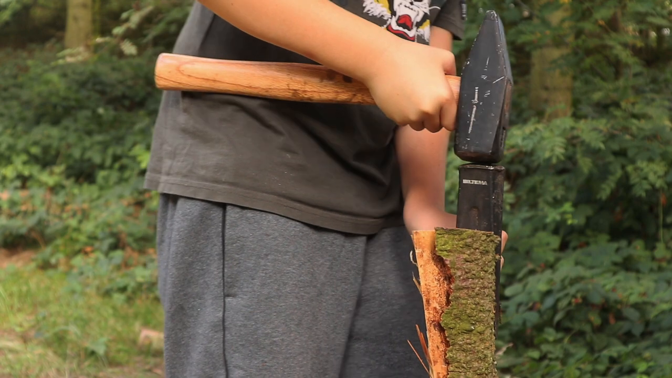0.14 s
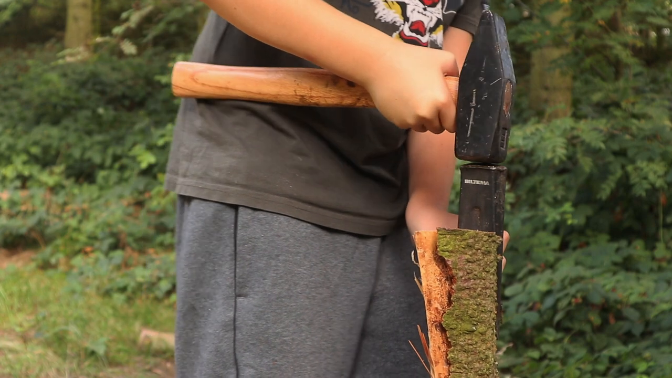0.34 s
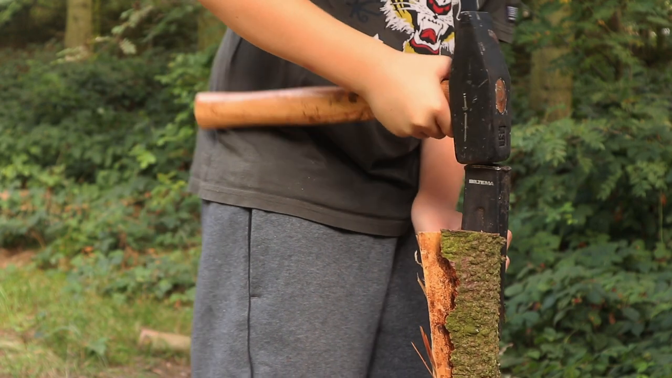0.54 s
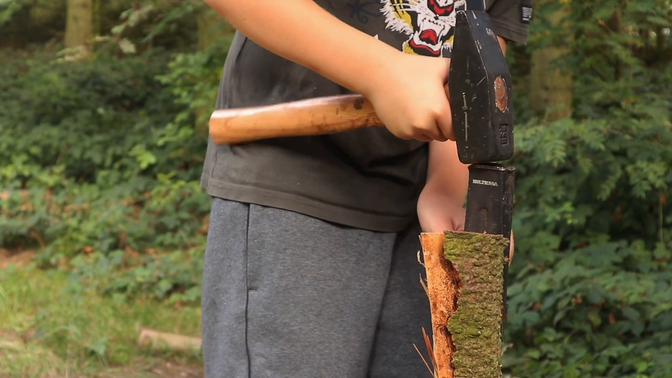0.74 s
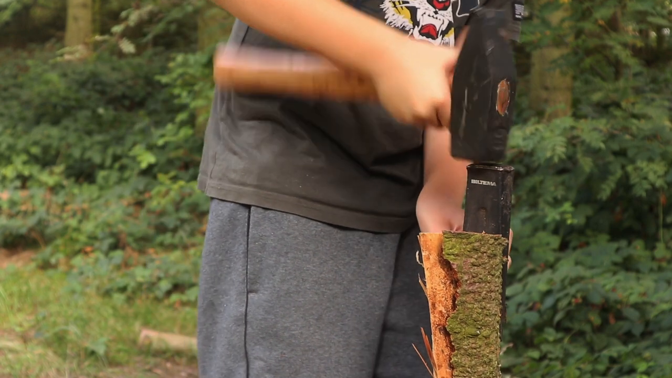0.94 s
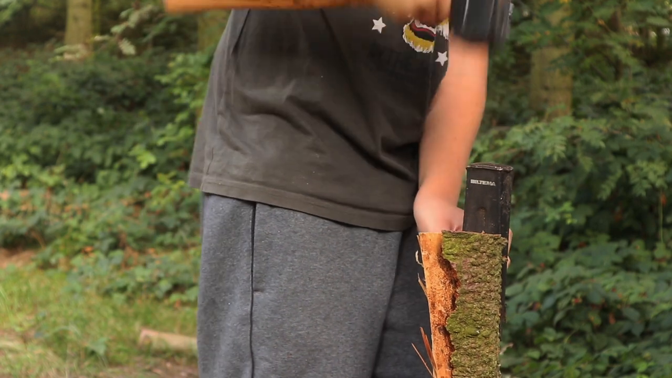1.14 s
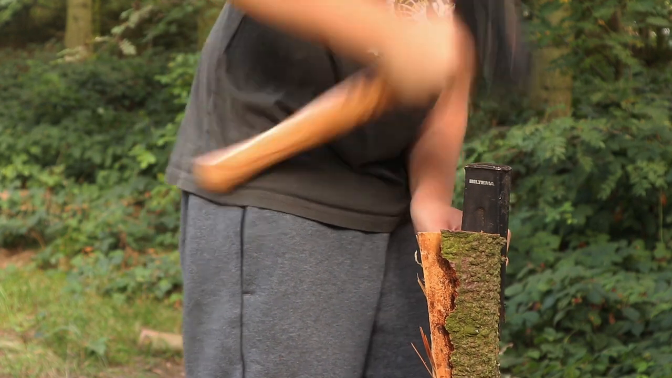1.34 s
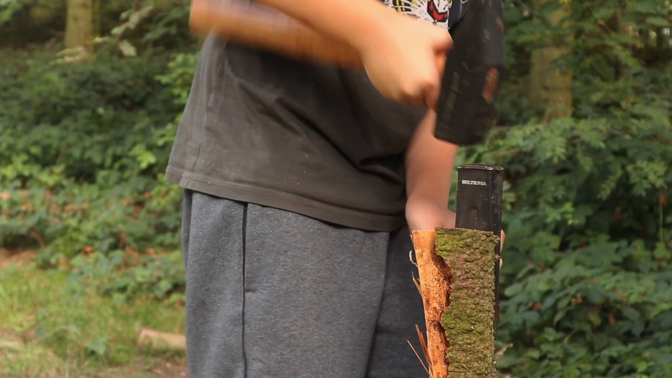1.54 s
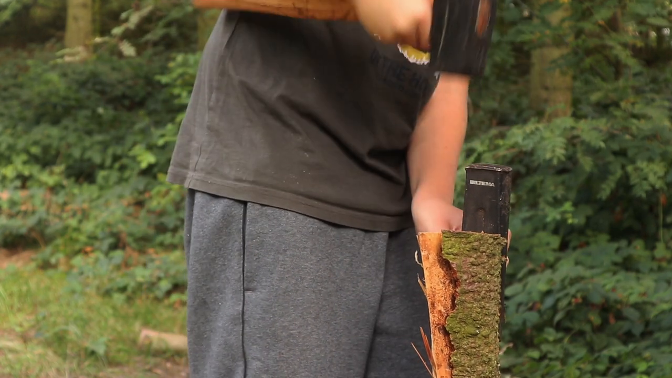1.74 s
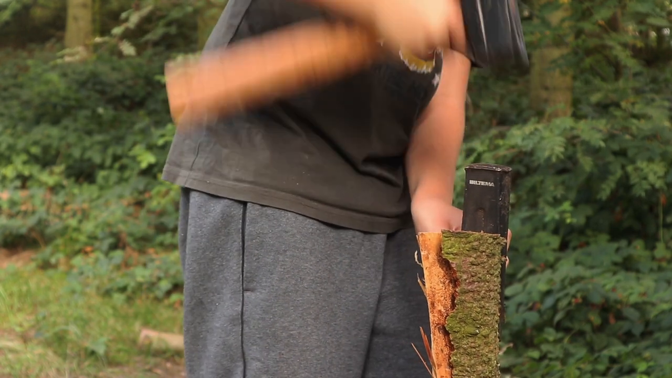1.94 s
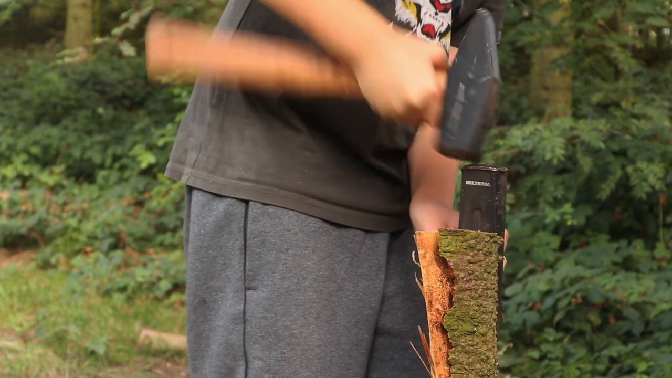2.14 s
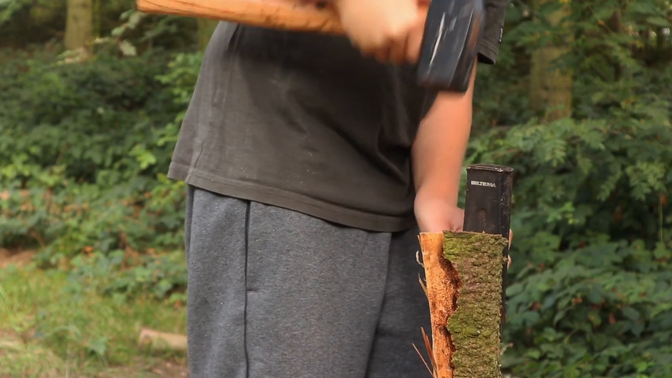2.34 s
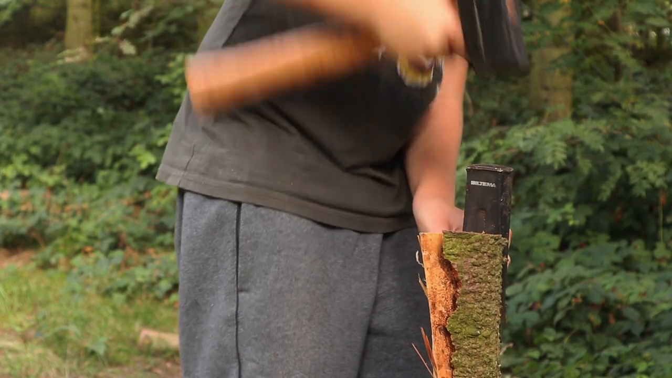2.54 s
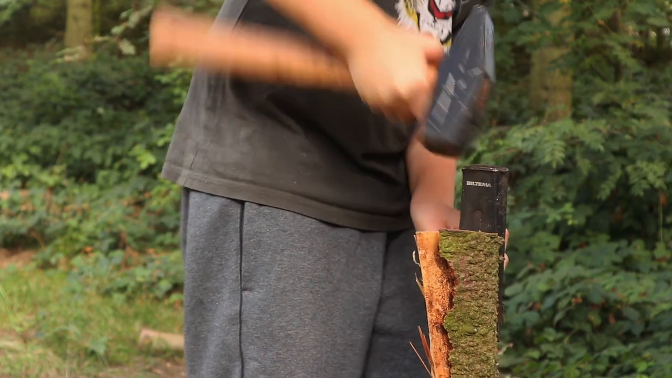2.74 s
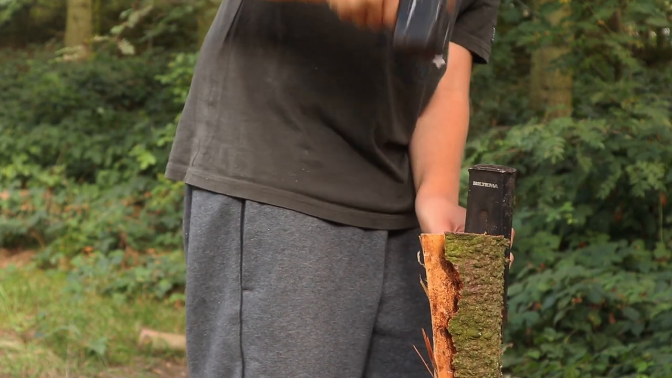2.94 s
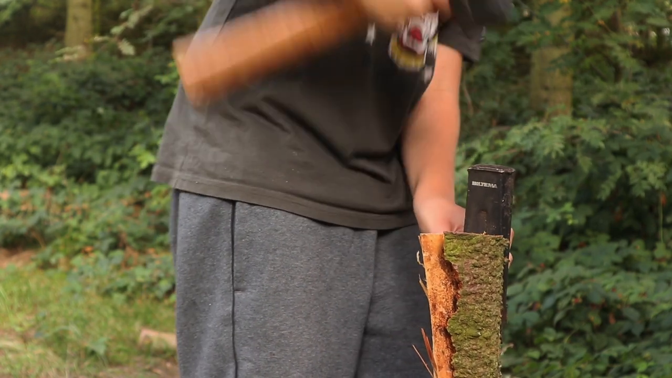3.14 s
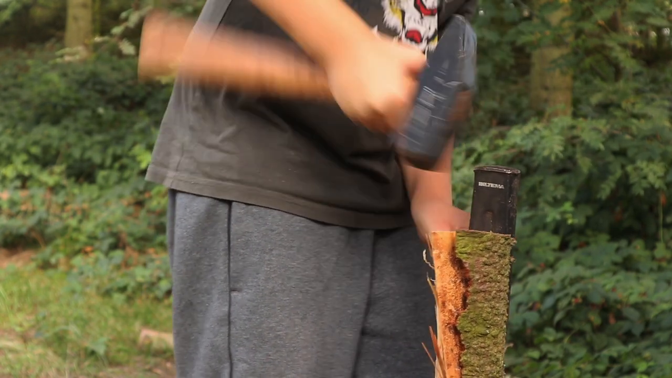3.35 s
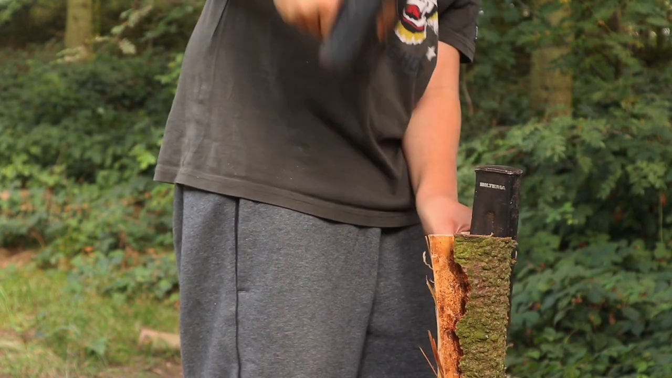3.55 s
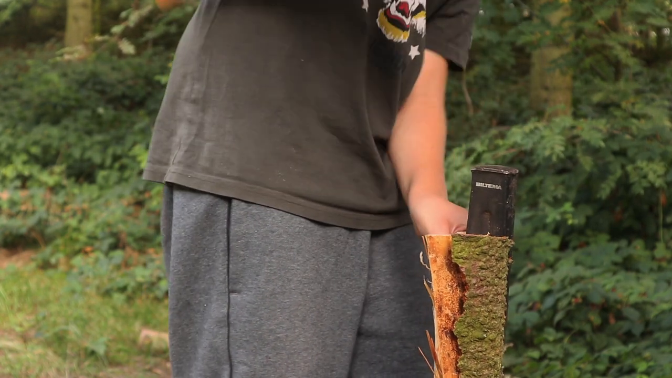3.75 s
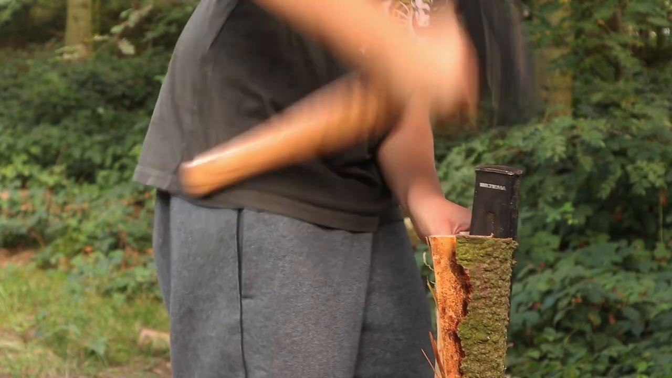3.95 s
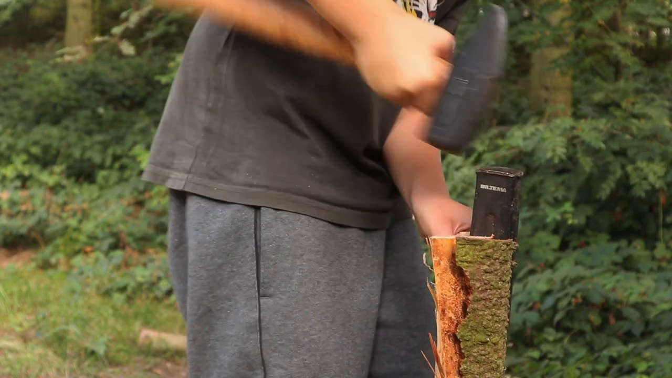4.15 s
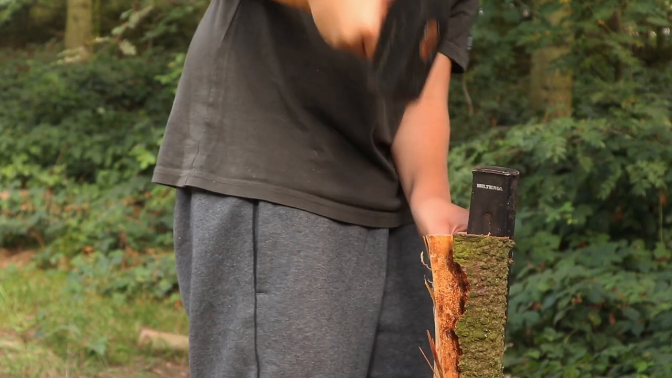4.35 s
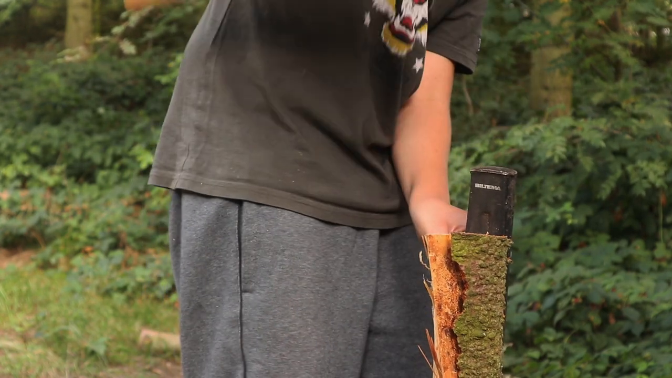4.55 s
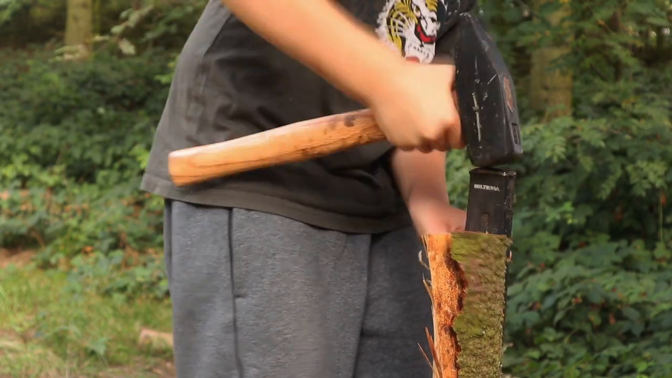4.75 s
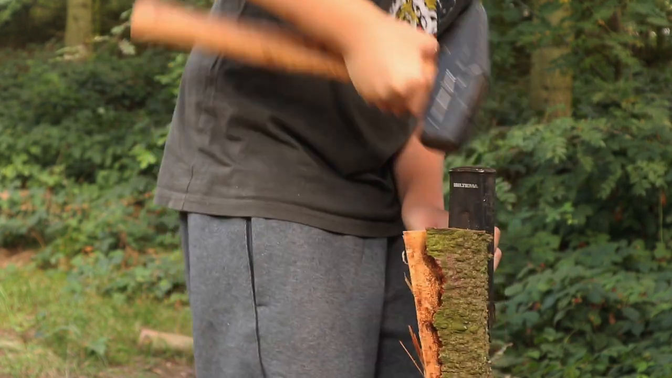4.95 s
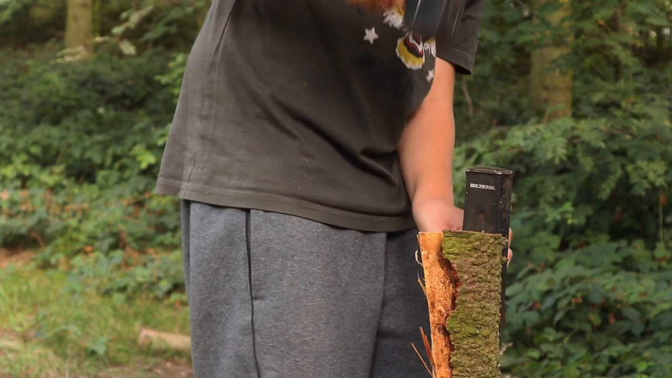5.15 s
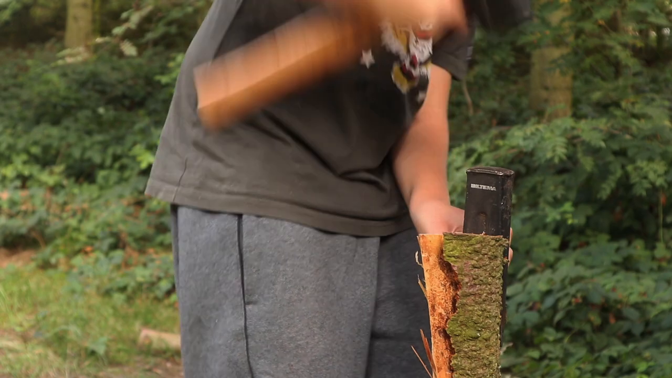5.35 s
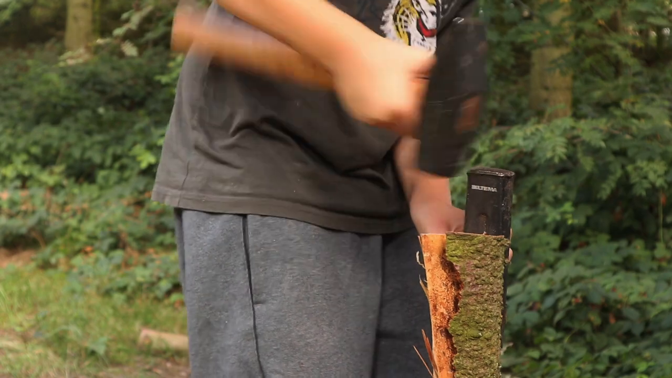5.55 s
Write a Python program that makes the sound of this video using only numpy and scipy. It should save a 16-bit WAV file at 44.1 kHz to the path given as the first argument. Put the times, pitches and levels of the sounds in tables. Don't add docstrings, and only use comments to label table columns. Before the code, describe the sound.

Seven hard hammer blows ring on a steel wedge in a log, cracking sharply and echoing off trees while birds whistle.

```python
import sys
import numpy as np
from scipy import signal
from scipy.fft import rfft, irfft, next_fast_len
from scipy.io import wavfile
from scipy.ndimage import uniform_filter1d

SR = 44100
rng = np.random.default_rng(int(sys.argv[2]) if len(sys.argv) > 2 else 0)


def unload_wav(signal):
    wavfile.write(
        sys.argv[1],
        SR,
        np.round(np.clip(np.atleast_2d(signal).T, -1, 1) * 32767).astype(np.int16),
    )


def volts(x):
    e = np.asarray(x, float) / 20
    return 10 ** e


N = 250915

# [t/s, strength of body sound and crack/dB, weight into the log/dB, glancing 0-1, centred on the
BLOWS = [
    (1.35, 5, 10, 0.1, 0.02),
    (1.987, 0.06, 3.5, 0, .05),
    (2.596, -7.5, 4, 0.5, .05),
    (3.209, -9.5, 2.5, .95, 0.11),
    (3.977, -7.5, 1.66, .2, .95),
    (4.747, -11.5, 1, 0.01, 0.7),
    (5.428, -5, 1.5, 0.4, 0.9),
]
# [log knock level/dB, wedge bend level/dB, wedge twist level/dB, head level/dB, pitch factor]
LANDING = [(2.5, -6.5, -5, 1, 1.02), (-1.5, -1, -1.5, -2.5, .995), (3, 2, 0.5, 1, 1.0),
           (3, -2, 3, -2, .995), (-1.5, -5.5, -3.5, -2.5, .995), (-1.5, 3.5, 4.5, -0.5, .99),
           (-7.5, 0, -4, 1.5, 1.01)]
# [lowest knock level/dB, lower bend level/dB, lower twist level/dB,
# upper head level/dB]
FAVOURS = [(14, 3.5, 1, -2.5), (-12, -6, -8, 0.5), (10, 2, 1, -1), (6, 2, -16, -10.5), (6, 4.5, -6, 14),
           (4, -1, -4, 4), (1, 4.5, -6, 0.5)]
# [flank level/dB, face level/dB, top level/dB]
SINGS = [(4, -0.5, -3.5), (-1, -1, -2.5), (-0.5, -1.5, -2), (-2.5, -4, 0.5), (-5, 1, 0), (0, 3, 4),
         (4, 7, 7.5)]


def hammer_blows(near, side, sends):
    for k, parts in enumerate(BLOWS):
        s, sounds = blow(*parts, LANDING[k], FAVOURS[k], SINGS[k])
        for mix, sound in zip((near, side, sends[k % 3]), sounds):
            add(mix, s, sound)


# [f/Hz, level/dB, t60/s]
FLANK = [(6930, -3, .06), (8484, -2, .065), (9670, -3, .05)]
FACE = [(9104, -3, .13), (9150, -13, .09)]
TOP = [(12340, 0, .075), (15190, -8, .08)]
# [f/Hz, level/dB, t60/s]
THUD = [(150.5, -0.5, 0.023), (205, -3.5, 0.027), (288, -7, 0.028)]
# [f/Hz, level/dB, t60/s]
GROUND = [(45, -33, .26), (72, -41, .17), (115, -44, .14), (165, -43, .12)]
# [f/Hz, level/dB]
CRACK = [(60, -49), (450, -35.5), (1000, -10), (4000, -4), (7000, -4.5), (10000, -4.5), (14000, -17.5),
         (17000, -25.5)]
THUD_DB, THUD_PER_WEIGHT, CRACK_DB, ECHO_DB = -20.5, 2.6, 1.5, -21.5


def blow(s, strength_db, weight_db, glance, centre, landing, favours, sings_db):
    body_db, ring_db, chatter_s, bright_hz = contact(strength_db, weight_db, glance, centre)
    t = np.arange(1024) / SR
    tick = t == 0
    force = 0.18 * rng.standard_normal(len(t)) * np.exp(-(t / chatter_s) ** 2) + tick

    sound = log_and_steel(force, body_db, landing, favours)
    age = np.arange(len(sound)) / SR
    for modes, db in zip((FLANK, FACE, TOP), ring_db + sings_db):
        sound += struck(modes, force, db)
    sound += volts(THUD_DB + THUD_PER_WEIGHT * weight_db) * ring(THUD) * (1 - np.exp(-age / 0.001))
    sound += volts(weight_db / 2) * ring(GROUND) * (1 - np.exp(-(age / .015) ** 2))
    crack_db = strength_db + CRACK_DB
    sound[:len(t)] += volts(crack_db) * burst(CRACK, t, .0025)

    scatter_colour = CRACK[:-2] + [(12000, -32), (17000, -46)]
    scatter = volts(crack_db - 6) * burst(scatter_colour, t, min(.8 * chatter_s, .003))
    side = np.pad(scatter, (0, len(sound) - len(t)))

    echo = volts(-19.5 - strength_db) * sound * quick_fall(len(sound), .0025, -40)
    echo[0] += 6.5
    echo = signal.lfilter(*signal.butter(1, bright_hz, fs=SR), echo)
    return s + 0.0023, np.array([sound, side, volts(ECHO_DB + weight_db) * echo])


# [level/dB] of a square blow,
# then its change [level/dB] when glancing and when centred
BODY_DB = [5.9, 1.1, 11.78, 7.1]
GLANCE_DB = [-11.5, -5, -4.5, 6.5]
CENTRE_DB = [1, -1.8, 0.19, -2]
# flank, face and top rings of the steel, likewise [level/dB]
RING_DB = [-36, -44, -43]
RING_GLANCE_DB = [-2, -2, 5]
RING_CENTRE_DB = [6, 16, 1]
FIRM_S, SOFT_S = 0.0037, 0.0042
BRIGHT_HZ, DULL_OCTAVES = 11400, 1.05


def contact(strength_db, weight_db, glance, centre):
    body_change = np.multiply(GLANCE_DB, glance) + np.multiply(CENTRE_DB, centre)
    body_db = strength_db + np.add(BODY_DB, body_change)
    ring_change = np.multiply(RING_GLANCE_DB, glance) + np.multiply(RING_CENTRE_DB, centre)
    ring_db = np.add(RING_DB, ring_change)
    ring_db[0] += 2 * weight_db
    chatter_s = FIRM_S + (SOFT_S - FIRM_S) * glance
    bright_hz = BRIGHT_HZ / 2 ** (DULL_OCTAVES * max(glance, centre))
    return body_db, ring_db, chatter_s, bright_hz


# [f/Hz, level/dB, t60/s]
KNOCK = [(585, -9, 0.05), (780, 8, 0.055), (930, -12, .05), (1324, -5, 0.053)]
BEND = [(1515, 4.5, 0.037), (1842, 4.7, 0.054)]
TWIST = [(2199, 1.5, 0.025), (2768, 3.5, 0.01), (2690, -8.5, 0.03)]
HEAD = [(3400, 3, 0.02), (3795, 8.5, 0.014), (4450, -6, 0.044), (4792, -15.5, 0.058)]
HOLD_S, KNOCK_RISE_S = 0.0052, .002


def log_and_steel(force, body_db, landing, favours):
    *more_db, pitch = landing
    sounds = []
    favoured = (0, 0, 0, 2)
    for modes, extra_db, which, db in zip((KNOCK, BEND, TWIST, HEAD), favours, favoured, body_db + more_db):
        shifted = [(hz * pitch, own_db + extra_db * (i == which), t60)
                   for i, (hz, own_db, t60) in enumerate(modes)]
        sounds.append(struck(shifted, force, db))
    knock, *steel = sounds
    age = np.arange(len(knock)) / SR
    body = sum(steel) - knock * (1 - np.exp(-(age / KNOCK_RISE_S) ** 2))
    body = signal.lfilter(*signal.butter(6, 470, "high", fs=SR), body)
    return body * quick_fall(len(body), HOLD_S, -13) * (1 - np.exp(-age / 0.00017))


def struck(modes, force, db):
    return volts(db) * peaked(signal.oaconvolve(ring(modes), force)[:round(.4 * SR)])


def ring(modes, seconds=.4):
    t = np.arange(round(seconds * SR)) / SR
    return sum(volts(db - 60 * t / t60) * np.sin(2 * np.pi * hz * t) for hz, db, t60 in modes)


def quick_fall(size, hold_s, rest_db):
    return volts(rest_db) + np.exp(-(np.arange(size) / (hold_s * SR)) ** 1.7)


CRACK_ENDS_S = 0.0092


def burst(colour, t, decay_s):
    gain = volts(read(colour, np.fft.rfftfreq(len(t), 1 / SR)))
    noise = irfft(rfft(rng.standard_normal(len(t))) * gain)
    return peaked(noise * np.exp(-t / decay_s - (t / CRACK_ENDS_S) ** 4))


# [t/s, peak level/dB, upper mode level/dB, knock level/dB]
BOUNCES = [
    (1.9934, -6.5, -14.5, -15.5),
    (3.2199, -8, -9.5, -9.5),
    (3.244, -16, -16, -13),
    (4.013, -32.5, -6.5, 6),
    (5.4393, -6.5, -5, -22),
    (5.4654, -16.5, -11, -13.5),
    (5.5086, -17.5, -12, -14.5),
]
# [f/Hz, level/dB, t60/s]
LOOSE = [(1834.5, 0, 0.054), (2720, 0.0034, 0.03), (925, 0.0022, 0.012)]
# [f/Hz, level/dB]
CLACK = [(100, -50), (700, -26), (1400, -2), (3000, -3), (5000, -24), (16000, -65)]


def wedge_bounces(near, send):
    for s, db, *upper_db in BOUNCES:
        modes = [(hz, own_db + more_db, t60) for (hz, own_db, t60), more_db in zip(LOOSE, [0, *upper_db])]
        tap = volts(db) * ring(modes)
        onset = 1 - np.exp(-np.arange(len(tap)) / 12)
        tap *= quick_fall(len(tap), 0.0048, -22) * onset
        tap[:512] += volts(db - 4.5) * burst(CLACK, np.arange(512) / SR, .002) * onset[:512]
        add(near, s, tap)
        add(send, s, volts(-24) * tap * quick_fall(len(tap), .0015, -40))


# [t/s, level/dB, f/Hz, t60/s]
TICKS = [
    (.637, -56, 3000, 0.01),
    (.955, -55, 2000, 0.01),
    (1.83, -58, 2400, .012),
    (2.285, -50, 1150, .022),
    (4.014, -44, 380, .08),
    (4.488, -64, 1815, 0.016),
    (5.51, -42, 380, .04),
]


def small_knocks(near):
    for s, db, hz, t60 in TICKS:
        modes = [(hz, db, t60), (hz / 2.3, db - 3, t60), (hz * 2.7, db - 8, t60 / 2)]
        add(near, s, ring(modes, .05))


# [t/s from phrase start, note, level/dB, pitch factor, rasp width/Hz]
DUET = [(0, "upper", -49, 1, 190), (0, "lower", -49, 1, 200), (.07, "hop", -48, 1, 190),
        (.17, "upper", -59, 1, 300), (.077, "rise", -54, 1.1, 200), (.142, "rise", -54, 1, 200),
        (.09, "flat", -58, 1.1, 900), (-.048, "flat", -62, 1.5, 1800), (.155, "flat", -63, 1.9, 1200),
        (.007, "flat", -68, 2.5, 1200), (-.05, "linger", -71, 2.3, 2500), (-.03, "linger", -77, 2.85, 1500),
        (.06, "linger", -75, 2.45, 2000), (.17, "linger", -74, 2.5, 2500), (.25, "linger", -71, 2, 2500),
        (.105, "upper", -58, .97, 300), (.04, "rise", -62, 1.15, 300), (.13, "linger", -58, 1, 700),
        (.17, "flat", -60, 1.08, 900)]
# [t/s, level/dB]
DUET_AT = [(.333, 1.5), (.823, 0.5)]
# [t/s from start, note, level/dB, pitch factor, rasp width/Hz]
TRILL = [(0, "dip", -60.5, .995, 200), (.012, "drop", -65, 0.93, 20), (.022, "drop", -62, 1.01, 20)]
TRILL_S, TRILL_GAP_S, TRILL_SLOWS_S, TRILL_FADE_DB = 2.351, .0415, .0016, -.8
ARCH_S, ARCH_GAP_S, ARCH_DB = 2.936, .0825, -63
# [t/s from start, note, level/dB, pitch factor, rasp width/Hz]
RASP = [(-.017, "hiss", -7, 1, 900), (-.01, "linger", -22, 2, 2500), (0, "rasp", -7, 1, 550),
        (.002, "rasp", -1, 1, 200)]
# [t/s, level/dB]
RASP_AT = [(4.942, -52), (5.273, -50)]
# [t/s, note, level/dB, pitch factor, rasp width/Hz]
STRAYS = [(0.001, "linger", -64.5, 0.77, 1000), (.09, "linger", -72, .8, 960),
          (.9, "glide", -63.5, 0.96, 60), (1.05, "glide", -68, 0.42, 130), (1.232, "glide", -61, 0.99, 54),
          (1.29, "glide", -66, 0.64, 200), (1.772, "flat", -63, 1.01, 280), (1.785, "flat", -81, 2.6, 144),
          (1.825, "flat", -77, 1.5, 170), (2.167, "slide", -52, 1, 19.6), (2.243, "hook", -53.5, 1.01, 20),
          (2.858, "perch", -58.5, 1.025, 20), (4.305, "bow", -73, 1.12, 102),
          (4.395, "flat", -79, 1.85, 58), (4.398, "bow", -77.5, 0.91, 60), (4.445, "flat", -69, 0.99, 290),
          (4.503, "bow", -71, 0.94, 78), (4.615, "lift", -70, 0.96, 200), (4.638, "flat", -68, .99, 96),
          (4.675, "flick", -81.5, 1.04, 20), (4.718, "flick", -77, 1.16, 190)]


def song():
    k = np.arange(5)
    trill_at = zip(TRILL_S + TRILL_GAP_S * k + TRILL_SLOWS_S * k ** 2, TRILL_FADE_DB * k)
    arch_at = [(ARCH_S + ARCH_GAP_S * i, ARCH_DB) for i in range(4)]
    arch = [(0, "arch", 0, 1, 20)]
    notes = list(STRAYS)
    for phrase, times in (DUET, DUET_AT), (TRILL, trill_at), (arch, arch_at), (RASP, RASP_AT):
        for s, db in times:
            for lag, note, own_db, *rest in phrase:
                notes.append((s + lag, note, db + own_db, *rest))
    return notes


# [t/s from note start, f/Hz, level/dB]
DUET_NOTES = dict( upper=[(0, 5500, -6), (.006, 5750, 2), (.035, 5700, 1), (.05, 5500, 2), (.065, 5650, -5),
              (.14, 5700, -9)], lower=[(-.012, 4000, -14), (0, 4400, -7), (.008, 5050, -3), (.03, 5050, -5),
              (.045, 4950, 1), (.056, 4100, -5), (.066, 4050, -2)], hop=[(-.004, 4100, -3),
              (.004, 4500, -3), (.012, 5300, -1), (.025, 5350, 1), (.031, 4600, -8), (.05, 4800, 2),
              (.062, 5300, -6)], linger=[(0, 4800, -3), (.03, 5400, 0), (.09, 5250, -2), (.13, 5300, -8)],
              rise=[(0, 2948, -8), (.03, 3856, 0.5), (.05, 4200, -15.5)])
# [t/s, f/Hz, level/dB]
WHISTLES = dict( arch=[(0, 3300, -6), (.017, 3800, 0), (.023, 4150, -3), (.035, 2500, -3),
            (.038, 2450, -10)], slide=[(0, 3705, 0), (.018, 3520, -3.5), (.03, 3000, -7)],
            perch=[(0, 3400, -15.5), (.012, 3494, -6), (.025, 3400, -5.5), (.035, 2604, 2.5)],
            glide=[(0, 2790, -4.5), (.025, 2685, 0.5), (.05, 2600, -3.5)], hook=[(0, 4736, -20.5),
            (.012, 4150, -8.5), (.025, 3700, 3.5), (.034, 3314, 5.5)], dip=[(0, 6200, -5), (.01, 6350, 0),
            (.02, 5700, 2), (.035, 5900, -8)], drop=[(0, 8855, -4), (.006, 6186, 2.5), (.011, 4900, -3)])
# [t/s, f/Hz, level/dB]
FAR_NOTES = dict( lift=[(0, 4890, -9.5), (.012, 6366, 4.5), (.045, 6250, -22)], flat=[(0, 4116, -1),
             (.01, 4544, -3), (.03, 4400, -3.5), (.055, 4344, -4)], flick=[(0, 4575, 1), (.015, 4826, 12.5),
             (.024, 5800, 3)], bow=[(0, 7000, -6), (.015, 7930, -8), (.03, 7600, -10), (.045, 6580, -7.5)],
             rasp=[(-.005, 3300, -16), (.018, 4500, -4), (.03, 3950, -4), (.042, 3450, 0), (.058, 3300, 1),
             (.068, 3050, -8)], hiss=[(0, 5100, -9), (.015, 5970, -2), (.03, 6400, -9)])


def bird(note, db, factor, width_hz):
    s, hz, level_db = np.transpose({**DUET_NOTES, **WHISTLES, **FAR_NOTES}[note])
    t = np.arange(s[0], s[-1], 1 / SR)
    r = np.exp(-np.pi * width_hz / SR)
    noise = rng.standard_normal((len(t), 2)) @ [1, 1j]
    flutter = signal.lfilter([1], [1, -2 * r, r * r], noise)
    steady = np.clip(1.2 - width_hz / 300, 0, 1)
    carrier = steady + (1 - steady) * flutter / np.sqrt(np.mean(abs(flutter) ** 2))
    factor = factor * rng.uniform(.99, 1.01)
    db = db + rng.uniform(-1.5, 1.5)
    turns = np.cumsum(factor * uniform_filter1d(np.interp(t, s, hz), size=90)) / SR
    taper = min((.008 + width_hz / 40000) * SR / len(t), 1)
    swell = volts(db + np.interp(t, s, level_db)) * signal.windows.tukey(len(t), taper)
    return s[0], np.sqrt(2) * (carrier * np.exp(2j * np.pi * turns)).real * swell


def birds_around():
    clear, raspy = np.zeros(N), np.zeros(N)
    for s, *note in song():
        lead, sound = bird(*note)
        width_hz = note[-1]
        add(raspy if width_hz > 40 else clear, s + lead, sound)
    direct = np.outer(volts([-1, 1]), clear)
    direct += np.array([raspy * volts(1.2), np.roll(raspy, -1) * volts(-1.2)])
    wet = volts(-18) * clear + volts(-11.5) * raspy
    return direct + trees(wet, 0.0066, 0.59, -13.5)


# [f/Hz, t60/s]
TREES = [(60, .4), (300, .35), (1000, .5), (2000, .55), (4000, .5), (7000, .42), (10000, .32), (16000, .2)]
# [f/Hz, level/dB]
LEAVES = [(40, -24), (120, -14), (330, -12), (500, -3), (1200, -2), (2000, -3), (4000, 0), (7000, -5),
          (9600, -9), (10700, -34), (16000, -60)]


def trees(x, gap_s=0.00093, stretch=0.62, far_db=-16):
    slots = np.arange(0, SR - 20, 20)
    taps = np.zeros((2, SR))
    at = slots + rng.integers(0, 20, (2, len(slots)))
    np.put_along_axis(taps, at, rng.choice([-1., 1.], at.shape), 1)
    taps[1] = .75 * taps[0] + .65 * taps[1]
    hz, t, z = signal.stft(taps, SR, nperseg=256)
    fall_db = -60 * t / (stretch * read(TREES, hz)[:, None])
    dull = 1 / (1 + (hz[:, None] / 7000) ** 2)
    fade = volts(read(LEAVES, hz))[:, None] * (volts(fall_db) + volts(far_db + 0.64 * fall_db) * dull)
    tail = signal.istft(z * fade, SR, nperseg=256)[1]
    tail *= 1 - np.exp(-np.arange(tail.shape[1]) / (gap_s * SR))
    return signal.fftconvolve(x[None], tail / np.linalg.norm(tail[0]), axes=1)[:, :N]


# [f/Hz, level/dB per Hz]
AIR = [(20, -25), (40, -7), (62, 4.5), (102, 1.5), (125, -12.5), (300, -14.5), (600, -15.5), (1100, -22.5),
       (2100, -20), (3000, -22.5), (4100, -21.5), (5700, -32), (9000, -37.5), (11500, -51.5),
       (14000, -65.5)]
# [f/Hz, likeness -1 to 1]
SAME = [(60, 1), (180, 0.79), (550, 0.43), (1650, 0.29), (4970, -0.7), (15000, 0.94)]
# [f/Hz, level/dB]
LEAN = [(60, 0.0), (240, -0.5), (950, -0.5), (3770, 0.89), (15000, -0.5)]


def forest():
    frames, hz = N // 512 + 5, np.fft.rfftfreq(2048, 1 / SR)
    a, b, c, d, patches = rng.standard_normal((frames, 1025, 5)).T
    patches = evened(uniform_filter1d(uniform_filter1d(patches, 30, 0), 6, 1))
    same = np.clip(read(SAME, hz), -1, 1)[:, None]
    left = a + 1j * b
    right = same * left + np.sqrt(1 - same ** 2) * (c + 1j * d)
    z = np.array([left, right])
    patch_db = np.minimum(0.55 + 11 * hz / 10000, 3)[:, None] * patches
    lean_db = np.outer([.5, -.5], read(LEAN, hz))[..., None]
    z *= volts(read(AIR, hz)[:, None] + patch_db + lean_db)
    z /= np.sqrt(np.mean(signal.istft(z, nperseg=2048, noverlap=1536)[1] ** 2))

    level_db, rustle_db, breeze_db, fizz_db = background(np.arange(frames) * 512 / SR)
    rustle = np.exp(-(np.log((hz + 1) / 400) / .9) ** 2)[:, None]
    breeze = np.exp(-(np.log((hz + 1) / 2200) / .4) ** 2)[:, None]
    fizz = 1 / (1 + (5500 / (hz + 1)) ** 4)[:, None]
    z *= volts(level_db + rustle * rustle_db + breeze * breeze_db + fizz * fizz_db)
    return signal.istft(z, nperseg=2048, noverlap=1536)[1][:, :N]


# [t/s, level/dB, breeze level/dB]
GAIN = [(0, -57, 2), (.6, -49.5, -2.5), (1.3, -46, -2.5), (1.9, -51, 7.5), (2.3, -53.5, 3.5),
        (3.0, -58.5, -2), (3.9, -60, 1.5), (4.4, -59.5, -5.5), (5, -58.5, 2.5), (5.7, -59, -1)]
DUCK_DB, DUCK_S, RECOVER_S = -7.5, 0.2, 0.54
RUSTLE_DB, RUSTLE_SHARE, FIZZ_DB, FIZZ_SHARE = 2, 0.12, 3.5, 0.69
SWING_S, SWING_DB = 0.54, 4


def background(t):
    s, level_db, breeze_db = np.transpose(GAIN)
    since = t - np.array(BLOWS)[:, :1]
    after = np.maximum(since, 0)
    duck = ((1 - np.exp(-after / DUCK_S)) * np.exp(-after / RECOVER_S)).sum(0)
    swing_db = SWING_DB * (np.exp(np.minimum(since, 0) / SWING_S) * (since < 0)).sum(0)
    breeze_db = np.interp(t, s, breeze_db)
    level_db = np.interp(t, s, level_db) + DUCK_DB * duck
    rustle_db = RUSTLE_DB + RUSTLE_SHARE * breeze_db + swing_db / 2
    fizz_db = FIZZ_DB + FIZZ_SHARE * breeze_db + swing_db
    return level_db, rustle_db, breeze_db, fizz_db


def evened(x):
    return x / np.sqrt(np.mean(x ** 2) + 1e-20)


def peaked(x):
    return x / abs(x).max()


def read(points, hz):
    f, value = np.transpose(points)
    return np.interp(np.log(hz + 1), np.log(f + 1), value)


def add(mix, s, sound):
    part = mix[round(s * SR):][:len(sound)]
    part += sound[:len(part)]


PORT_LAG_S, PORT_TURN = 2.5e-5, 1.2


def two_ports(near, side):
    size = next_fast_len(N)
    turn = np.minimum(2 * np.pi * np.fft.rfftfreq(size, 1 / SR) * PORT_LAG_S, PORT_TURN)
    lagged = irfft(rfft(near, size) * np.exp(-1j * turn), size)[:N]
    return np.array([lagged + side, near * volts(1.26) - side])


def scene():
    near, side, sends = np.zeros(N), np.zeros(N), np.zeros((3, N))
    hammer_blows(near, side, sends)
    wedge_bounces(near, sends[0])
    small_knocks(near)
    return two_ports(near, side) + sum(map(trees, sends)) + birds_around() + forest()


def low_pass(x):
    return signal.sosfilt(signal.butter(12, 15980, fs=SR, output="sos"), x)


def record(dry):
    clipped = .985 * dry / (1 + abs(dry) ** 10) ** .1
    cut = signal.lfilter(*signal.butter(1, 55, "high", fs=SR), clipped)
    return low_pass(np.clip(cut, -1, 1))


dry = scene()
out = record(dry)
unload_wav(out)
```